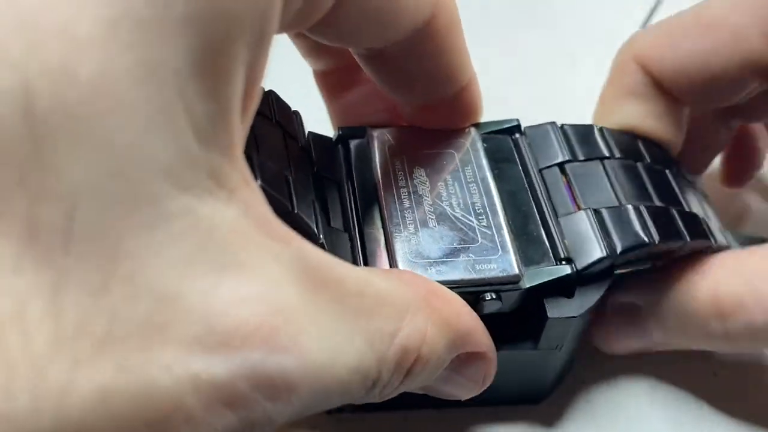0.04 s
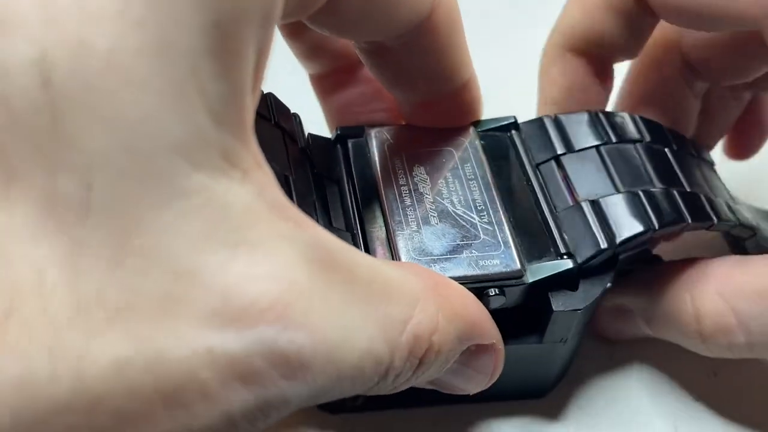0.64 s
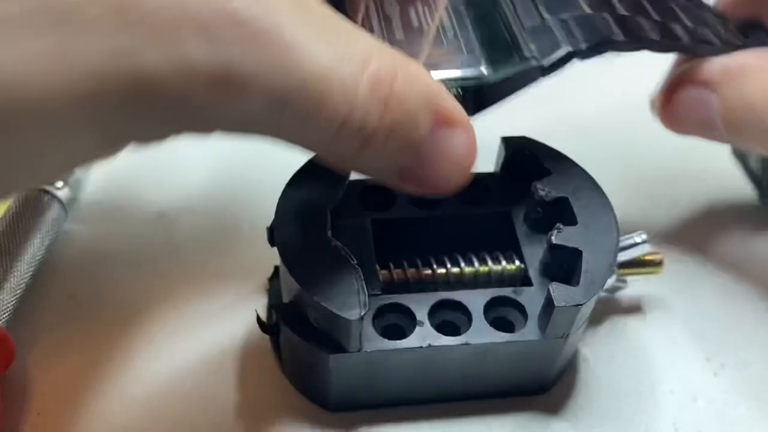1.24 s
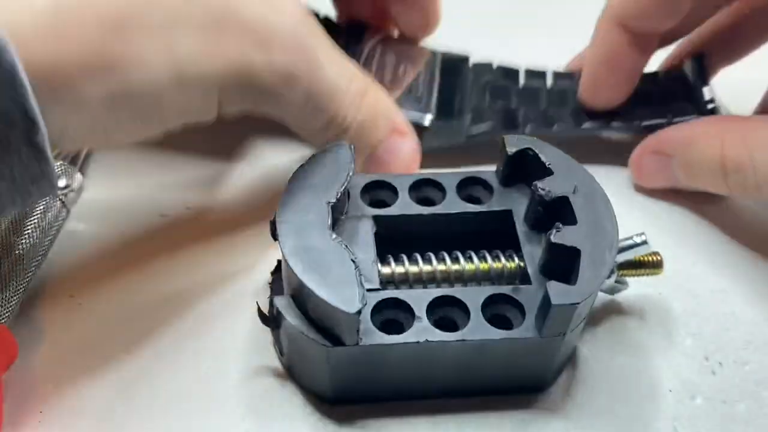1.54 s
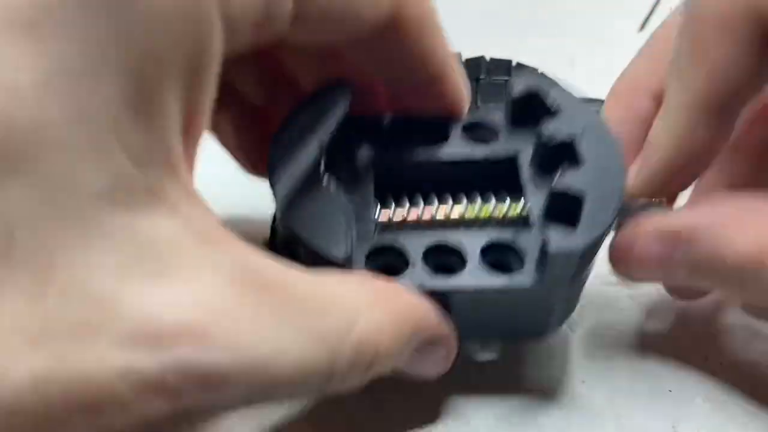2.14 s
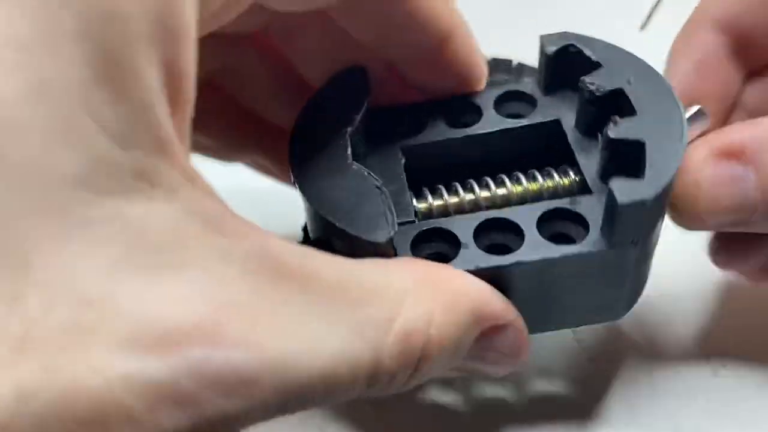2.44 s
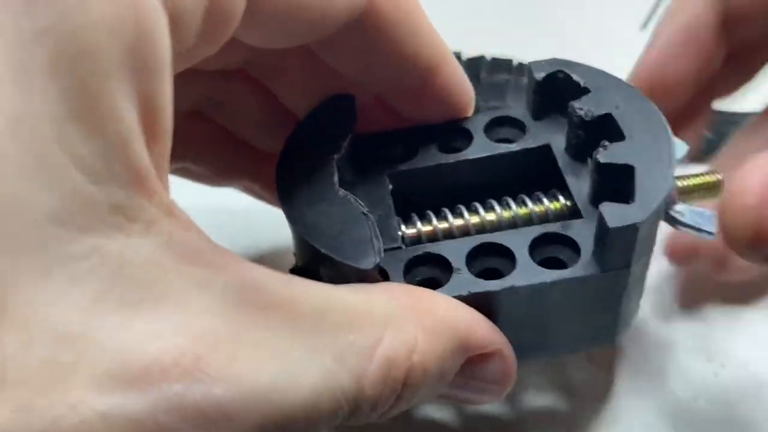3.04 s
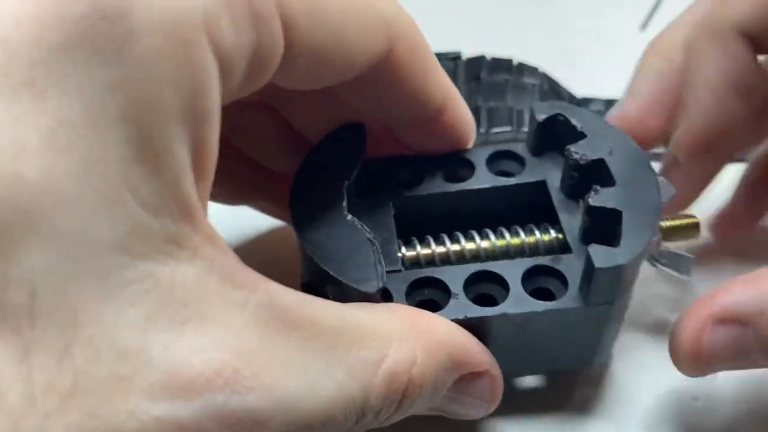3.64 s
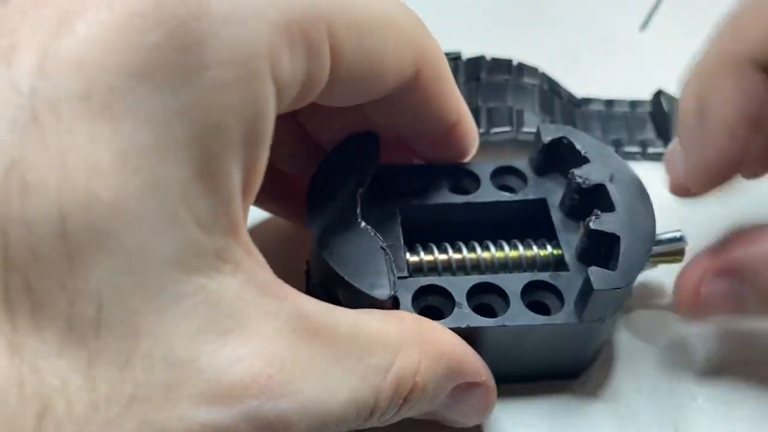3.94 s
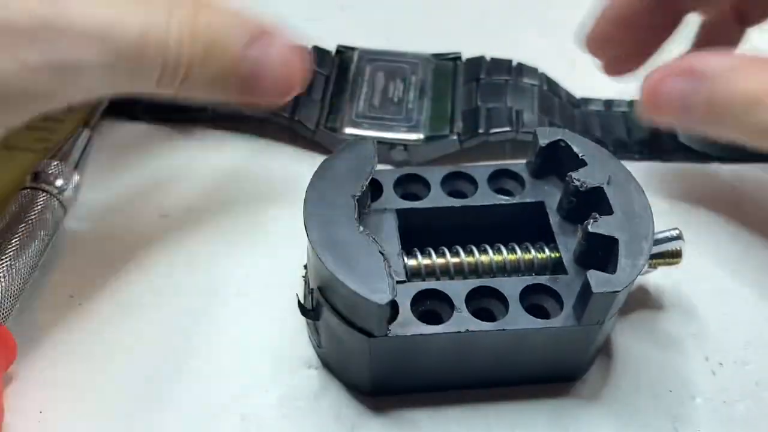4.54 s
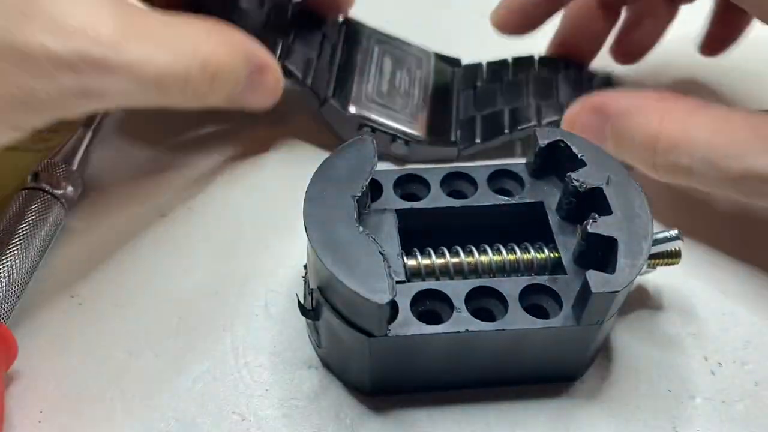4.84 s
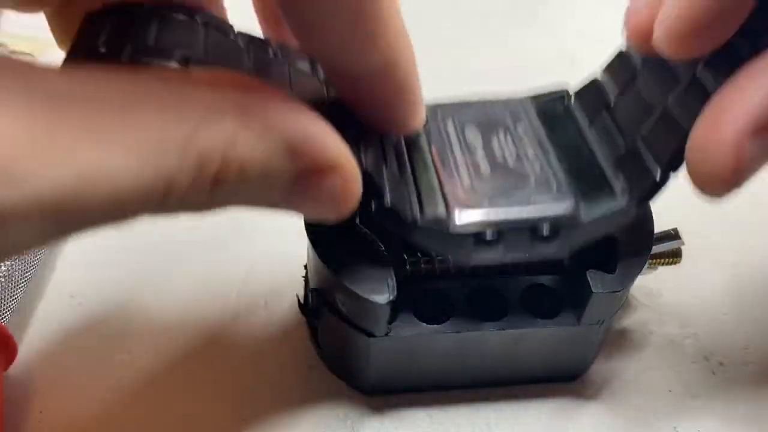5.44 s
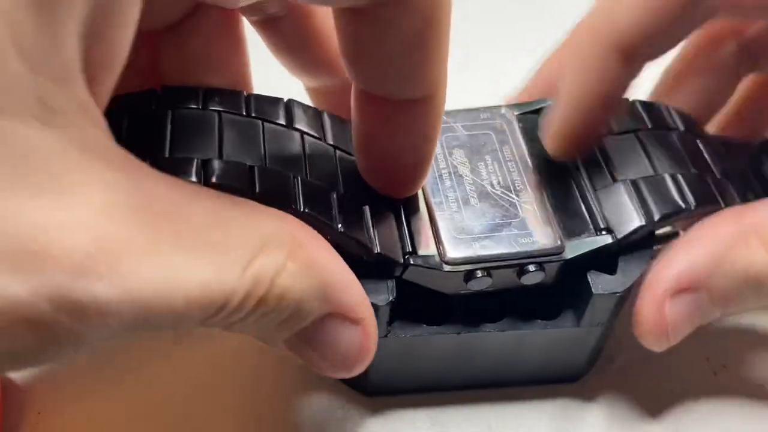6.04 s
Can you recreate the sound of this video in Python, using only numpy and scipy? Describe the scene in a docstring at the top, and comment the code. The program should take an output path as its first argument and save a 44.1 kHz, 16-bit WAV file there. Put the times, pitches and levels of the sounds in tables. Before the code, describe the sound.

For the first second or so, the steel links of a watch bracelet tick and rustle lightly as fingers lift it from a plastic holder. From about 1.3 seconds the clicks and knocks thicken, ending in a loud thud and clack at 1.7 as the watch lands on the table. Between 2 and 4.3 seconds it is quieter: the holder's wing nut turns in faint, short rasps with small metallic clicks and a slight spring ring, the sharpest near 3.5. Soft knocks and a brush of skin on the table follow. From 4.7 seconds the links tick and rattle again, growing busier around 5.4, until the watch snaps into the holder with a loud click and knock at 5.9. A few smaller clicks follow until about 6.2. Everything is close to the microphone in a small, quiet room.

```python
"""Steel links tick and rustle as fingers lift a watch out of a plastic holder; it is put down, and the
table's modes answer with a thud and a clack. The holder's wing nut is turned: stick-slip friction rasps
in the thread, and knocks of the nut ring the spring and the holder. The watch is then picked up and
snapped back between the jaws. A phone with two microphone ports is close by in a small, quiet room."""
import sys
import numpy as np
from scipy import signal
from scipy.fft import rfft, irfft, next_fast_len
from scipy.io import wavfile

SR = 44100
rng = np.random.default_rng(int(sys.argv[2]) if len(sys.argv) > 2 else 0)


def waveform_to_disk(signal):
    """Save audio, clipped to [-1, 1], as 16-bit WAV at the path in sys.argv[1]."""
    frames = np.transpose(np.atleast_2d(signal))
    scaled = np.clip(frames, -1, 1) * 32767
    samples = np.round(scaled).astype(np.int16)
    wavfile.write(sys.argv[1], SR, samples)


N = 276885
T = np.arange(N) / SR
TOP_HZ = 16200

# normal modes of the watch case and links: f/Hz, level/dB, t60/s
STEEL = [(1750, 2, .009), (2170, 1, .015), (2760, 0, .015), (3300, -2, .005), (3900, -2, .005),
         (5200, -4, .004), (6600, 2, .007), (7100, -1, .005), (7700, 1, .008), (8400, -1, .004),
         (9950, 1, .006), (10500, 0, .005), (11000, 0, .009), (12200, 1, .009), (13200, 0, .004),
         (14400, 1, .005), (15300, 2, .005)]


def undb(db):
    """Amplitude ratio of a level in decibels."""
    return 10 ** (np.asarray(db) / 20)


def unit(x, span):
    """Energy normalisation: spread over span seconds, x would have rms 1."""
    return x / np.sqrt(np.sum(x ** 2) / (span * SR) + 1e-18)


def shape(points, hz):
    """Gain of an (f/Hz, level/dB) outline, interpolated in log frequency."""
    f, db = np.transpose(points)
    return undb(np.interp(np.log(hz + 1), np.log(f), db))


def bell(hz, centre_hz, width, db):
    """Gain of a Gaussian bump in log frequency."""
    return undb(db * np.exp(-(np.log((hz + 1) / centre_hz) / width) ** 2))


def colour(x, points):
    """Spectral shaping by an outline; rms 1."""
    y = irfft(rfft(x) * shape(points, np.fft.rfftfreq(len(x), 1 / SR)), len(x))
    return y / y.std()


def band(x, lo_hz, hi_hz):
    """Causal band-pass filter."""
    sos = signal.butter(3, [lo_hz, min(hi_hz, .48 * SR)], "band", fs=SR, output="sos")
    return signal.sosfilt(sos, x)


def fade(t, t60):
    """Exponential decay, 60 dB in t60 seconds."""
    return np.exp(-np.log(1000) * t / t60)


def add(track, start, x):
    """Superposition: mix x into a track from start seconds on."""
    i = max(int(start * SR), 0)
    track[..., i:i + x.shape[-1]] += x[..., :N - i]


def strokes(rows, taper):
    """Amplitude envelope of movements; taper is the share of each spent rising and falling."""
    envelope = np.zeros(N)
    for start, length, db in rows:
        add(envelope, start, undb(db) * signal.windows.tukey(int(length * SR) + 2, taper))
    return envelope


def grains(count, per_s, spread_db):
    """Shot noise: sparse tiny impacts of unequal size."""
    size = undb(spread_db * np.minimum(rng.exponential(size=count), 4))
    return (rng.random(count) < per_s / SR) * size * rng.standard_normal(count)


def ring(modes, t, scatter_db, detune):
    """Free vibration: damped modes, one row each, with weight, pitch and phase drawn anew per blow."""
    hz, db, t60 = np.transpose(modes)[:, :, None]
    weight, pitch, phase = rng.standard_normal((3, len(modes), 1))
    cycles = hz * (1 + detune * pitch) * t + phase
    return undb(db + scatter_db * weight) * np.sin(2 * np.pi * cycles) * fade(t, t60)


def friction(spectrum, per_s, spread_db, smooth_db, catch_db, catch_hz):
    """Stick-slip friction: asperities catch and let go, giving grains over a hiss, in spurts; rms 1."""
    noise = unit(grains(N, per_s, spread_db), N / SR) + undb(smooth_db) * rng.standard_normal(N)
    spurts = np.interp(T * catch_hz, np.arange(4000), rng.standard_normal(4000))
    return colour(noise * undb(catch_db * spurts), spectrum)


def ticks(events, modes, crack_db, crack_t60, contact_s, scrape_db, body_db, variety):
    """Impact of small metal parts: a chattering contact force convolved with their impulse response."""
    out, t, lead_s = np.zeros(N), T[:8192], .004
    hz = np.fft.rfftfreq(len(t), 1 / SR)
    lowest_hz = modes[0][0]
    for start, db, bright_hz, low_db in events:
        partials = ring(modes, t, scatter_db=2 * variety, detune=.012 * variety)
        crack = unit(rng.standard_normal(len(t)) * fade(t, crack_t60), 1)
        response = unit(partials.sum(0), .92) + undb(crack_db) * crack
        chatter_s = contact_s * undb(.058 * (db + 21.5))  # harder blows chatter longer
        age = (t - lead_s) / chatter_s - .5
        contact = np.exp(-(age / .54) ** 2) + undb(scrape_db) * np.exp(-np.abs(age))
        force = contact * rng.standard_normal(len(t))
        # the struck part favours its own range of pitch
        sound = irfft(rfft(response) * rfft(force) * bell(hz, bright_hz, width=.2, db=5))
        treble = unit(band(sound, 5000, 19000), .94)
        body = undb(low_db + body_db) * unit(band(sound, .93 * lowest_hz, 3600), 1)
        add(out, start + .0006 - lead_s, undb(db) * unit(treble + body, .00082))
    return out


def hush(level_db=-69, side_db=-11):
    """Ambient noise: the room's low, steady background, largely coherent at the two ports."""
    # noise spectrum: f/Hz, level/dB
    spectrum = [(20, -10.5), (50, 1), (80, 1.5), (160, -8.5), (350, -16.5), (1000, -30), (2000, -29),
                (4000, -32.5), (8000, -38), (12000, -37), (16000, -48.5)]
    mid, side = (colour(rng.standard_normal(N), spectrum) for _ in range(2))
    return undb(level_db) * (mid + undb(side_db) * np.array([side, -side]))


def grip_rumble():
    """Structure-borne sound: friction of a hand changing its grip makes the holder rumble."""
    # grips: t/s, duration/s, level/dB
    grips = [(0, 0.43, -62), (.36, 0.31, -58), (.72, 0.91, -60), (.89, 0.18, -56.5), (1.31, .13, -45),
             (1.43, 0.35, -56.5), (1.8, 0.24, -65.5), (4.09, 0.267, -71), (4.7, 0.38, -61),
             (5.42, 0.35, -54.5), (5.85, 0.44, -50)]
    # rumble spectrum: f/Hz, level/dB
    spectrum = [(40, -14.5), (80, 6.5), (140, -4.5), (230, 2), (340, -5.5), (500, -29), (1200, -33)]
    rumble = friction(spectrum, per_s=120, spread_db=-1.5, smooth_db=2.5, catch_db=6.5, catch_hz=23.96)
    return strokes(grips, taper=.25) * rumble


def loose_links(per_s=45, spread_db=4, chatter_t60=.005):
    """A random impact train: links drop into their play and ring briefly; rms 1."""
    out, t = np.zeros(N), T[:SR // 50]
    starts = np.cumsum(rng.gamma(2, .5 / per_s, int(2 * per_s * N / SR)))
    for start in starts[starts < T[-1]]:
        chatter = rng.standard_normal(len(t)) * fade(t, chatter_t60)
        tick = signal.fftconvolve(chatter, ring(STEEL, t, scatter_db=3, detune=.03).sum(0))
        add(out, start, undb(spread_db * rng.standard_normal()) * unit(tick, 1))
    return unit(band(out, 3200, TOP_HZ), N / SR)


def bracelet_rustle():
    """Sliding friction of link on link and skin on steel, with loose ticks; movements add in power."""
    # the bracelet bends or slides in the fingers: t/s, duration/s, level/dB
    flexes = [(.035, 0.07, -56.5), (.275, 0.17, -71.5), (.37, 0.12, -49.5), (.54, 0.062, -59.5),
              (.73, 0.065, -55.5), (.91, 0.16, -63.5), (1.17, 0.065, -67), (1.32, 0.094, -56),
              (1.53, .19, -44), (4.58, 0.21, -69), (4.75, 0.07, -51), (5.03, 0.14, -58),
              (5.425, 0.064, -54.5), (5.6, 0.13, -64), (5.81, 0.025, -52.5), (5.885, 0.072, -47),
              (6.055, 0.11, -52), (6.135, .11, -44.5)]
    # the held watch shifts slightly: t/s, duration/s, level/dB
    holds = [(0, 0.13, -67.5), (.35, 0.42, -78), (.7, 0.28, -66.5), (.98, 0.43, -67), (4.66, 0.26, -69.5),
             (4.9, 0.23, -63), (5.4, 0.338, -72.5), (5.8, 0.45, -61)]
    # spectrum of links sliding over each other: f/Hz, level/dB
    slide = [(900, -14), (2200, -2), (3200, 0), (5000, -0.5), (7300, 4), (9000, -1.5), (12000, 1.5),
             (15500, -1), (17000, -27)]
    # spectrum of skin dragging on links: f/Hz, level/dB
    skin = [(250, -9), (450, -1), (800, 2), (1300, -5), (2200, -14), (5000, -26)]
    flex, held = strokes(flexes, taper=.43), strokes(holds, taper=.3)
    crackle = friction(slide, per_s=450, spread_db=3.7, smooth_db=-8, catch_db=4.5, catch_hz=90)
    drag = friction(skin, per_s=500, spread_db=3.5, smooth_db=-2, catch_db=2.5, catch_hz=60)
    links = undb(-2) * crackle + undb(-1) * loose_links()
    return np.hypot(flex, held) * links + np.hypot(undb(-8) * flex, held) * drag


def table_knocks(split_hz=480, rise_s=.008):
    """Impact excitation: low table modes thud, high ones clack, links rattle; returns wood and steel."""
    # blows through holder, watch or hand: t/s, thud level/dB, thud f/Hz, clack level/dB, rattle level/dB
    blows = [(.002, -52, 140, -67, -63), (0.189, -50, 146, -67, -69.5), (.441, -50, 237, -48, -38.5),
             (.776, -48.5, 352, -46.5, -65), (1.003, -37, 139, -73, -57), (1.32, -33.5, 345, -39, -48.5),
             (1.359, -31.5, 242.5, -57, -59), (1.521, -29, 352.2, -57, -43), (1.542, -50, 223, -48, -37),
             (1.571, -32.5, 190, -28.5, -27.5), (1.626, -37.5, 201.6, -37, -38.5),
             (1.7023, -16, 328, -15.5, -34.5), (3.873, -49, 229.4, -70.5, -66),
             (4.355, -43.5, 232, -68.5, -61), (4.365, -49, 114, -85, -73), (4.579, -59.5, 113.5, -82, -74),
             (5.072, -52.5, 371, -46, -48), (5.414, -37.5, 296, -54, -45.5),
             (5.463, -42, 112.5, -57.5, -45), (5.64, -44, 290, -43, -49.5), (5.824, -44.5, 208, -67, -59),
             (5.935, -26, 258, -18.5, -24.5), (6.159, -56, 215, -59, -58), (6.191, -43, 187, -40, -36.5)]
    # normal modes of table and holder: f/Hz, level/dB, t60/s
    modes = [(75.6, -22.5, 0.087), (121, -12.5, 0.19), (145.7, -13, .2), (215, -9.5, .15),
             (303.7, -6, 0.06), (344, 2.5, 0.045), (371.4, -6.5, 0.02), (527, -4, 0.15), (695.6, -2, 0.07),
             (847, -1, 0.069), (957, -7.5, 0.071), (993.6, 0.5, 0.063), (1142, -2.5, 0.051),
             (1350, -5.5, 0.04), (1467, -8, 0.053), (1740, -18, .05), (2179, -13, 0.02),
             (3000, -12.5, 0.018)]
    wood, steel, t = np.zeros(N), np.zeros(N), T[:SR // 3]
    hz = np.transpose(modes)[0]
    low = hz < split_hz
    rise = 1 - np.exp(-t / rise_s)  # the heavy top takes a moment to get moving
    for start, thud_db, thud_hz, clack_db, rattle_db in blows:
        partials = ring(modes, t, scatter_db=1, detune=.003)
        noise = rng.standard_normal(len(t))
        # a softer, longer push favours lower modes
        thud = unit(bell(hz[low], thud_hz, width=.25, db=8) @ partials[low], 1)
        thud += undb(-9.5) * unit(band(noise, 140, split_hz) * fade(t, t60=.073), 1)
        add(wood, start, undb(thud_db) * unit(thud * rise, .012))
        clack = unit(partials[~low].sum(0), 1)
        clack += undb(-4) * unit(band(noise, 450, 1450) * fade(t, t60=.072), .89)
        add(wood, start, undb(clack_db) * unit(band(clack, 600, 3500), .009))
        shake = grains(len(t), per_s=5000, spread_db=6.8) * fade(t, t60=.13)
        link_response = ring(STEEL, T[:SR // 30], scatter_db=5, detune=.022).sum(0)
        ringing = signal.fftconvolve(shake, link_response)[:len(t)]
        rattle = unit(ringing, .93) + undb(1.5) * unit(band(shake, 1200, 8300), 1)
        add(steel, start, undb(rattle_db) * unit(rattle, .0082))
    return wood, steel


def link_strikes():
    """Hard, brief contact of link on link excites the high modes of the steel."""
    # strikes: t/s, level/dB, brightest ring f/Hz, relative body level/dB
    strikes = [(.0576, -37.5, 12100, -7.5), (.3789, -33, 6400, -13), (.4387, -22, 6530, -15.5),
               (.5708, -42, 11500, -11), (.7736, -35, 6720, -13), (.8954, -46, 12100, -14),
               (.9074, -40.5, 4040, -7.5), (.9853, -44.5, 6270, -6), (1.0105, -38, 7400, -14),
               (1.2488, -44, 12500, -6), (1.3194, -27, 11400, -35), (1.348, -37.5, 6400, -11),
               (1.3784, -38.5, 6880, -29), (1.4082, -30, 10800, -15), (1.5259, -23, 10600, -35),
               (1.5404, -23.5, 12200, -14), (1.5715, -13.5, 7050, -3.5), (1.6251, -22.5, 5370, -4.5),
               (1.7017, -10, 7054, -9), (4.6667, -38.5, 7760, -15.5), (4.707, -31.5, 7520, -28),
               (4.7334, -29.5, 10000, -14), (4.7669, -19.5, 10400, -33), (4.793, -34.5, 3900, -20),
               (4.8123, -35.5, 10700, -30), (4.8254, -35, 9650, -35.5), (4.849, -36.5, 10500, -9.5),
               (4.9358, -34, 10900, -11), (4.9428, -34.5, 10500, -20), (5.036, -35, 12200, -23),
               (5.0694, -37.5, 10900, -0.5), (5.0873, -25.5, 11100, -24), (5.1367, -46.5, 6310, -8),
               (5.1707, -36, 7080, -28), (5.179, -38.5, 12250, -13.5), (5.2171, -39, 15100, -15),
               (5.4012, -34.5, 6400, -14), (5.4364, -21.5, 8100, -18), (5.4424, -24, 7740, -7.5),
               (5.4604, -30, 11400, -7.5), (5.469, -25.5, 7860, -35), (5.5351, -32.5, 7600, -11),
               (5.5472, -31.5, 7300, -16), (5.5892, -17, 7100, -8.5), (5.6361, -17, 12000, -16),
               (5.6508, -28, 14650, -11.5), (5.8021, -41.5, 9970, -9.5), (5.8326, -28.5, 11060, -16.5),
               (5.878, -14, 7240, -5.5), (5.8956, -28, 7710, 5), (5.9357, -5.5, 10900, -4),
               (5.9421, -15, 10200, -26), (6.0075, -35, 10500, -7), (6.0686, -41, 12500, -5),
               (6.137, -20, 13200, -9.5), (6.1906, -21, 7700, -36), (6.2148, -31, 5100, -24)]
    return ticks(strikes, STEEL, crack_db=-5, crack_t60=.00081, contact_s=.0028,
                 scrape_db=-18.5, body_db=-.5, variety=3.2)


def finger_scuffs():
    """Friction coloured by resonance: fingertips scuff the hollow holder and the watch."""
    # scuffs: t/s, duration/s, level/dB
    scuffs = [(.18, 0.077, -60), (.772, 0.041, -46), (.99, .043, -75), (1.185, 0.054, -50.5),
              (4.74, 0.16, -58), (4.93, 0.11, -60.5), (5.065, 0.062, -54)]
    # scuff spectrum: f/Hz, level/dB
    spectrum = [(150, -16), (350, -0.5), (600, -3), (850, 1), (1150, -3), (1600, -20), (4000, -31)]
    rub = friction(spectrum, per_s=530, spread_db=5.5, smooth_db=8, catch_db=5.5, catch_hz=87.56)
    return strokes(scuffs, taper=.79) * rub


def skin_sweeps():
    """Broadband friction noise: skin sweeps lightly over the table."""
    # sweeps: t/s, duration/s, level/dB
    sweeps = [(.72, 0.086, -60), (1.17, 0.15, -64.5), (1.92, 0.68, -78.5), (4.29, 0.45, -70),
              (4.55, 0.2, -67.5), (4.93, 0.1, -62.5)]
    # hiss spectrum: f/Hz, level/dB
    spectrum = [(600, -18.5), (2000, -7), (4000, 0), (7000, 2), (11000, -0.5), (15500, -4.5), (17000, -22)]
    return strokes(sweeps, taper=.26) * colour(rng.standard_normal(N), spectrum)


def thread_rasp():
    """Stick-slip friction: the wing nut rasps along its thread in short strokes."""
    # turns of the nut: t/s, duration/s, level/dB
    turns = [(1.94, 0.096, -72.5), (2.119, .031, -67), (2.204, 0.033, -65.5), (2.298, 0.058, -54),
             (2.39, .13, -61.5), (2.53, 0.084, -77), (2.702, 0.055, -58), (2.74, 0.135, -62.5),
             (3.04, 0.075, -58.5), (3.11, .15, -64), (3.365, 0.17, -61.5), (3.702, 0.061, -60),
             (3.755, 0.067, -56.5), (4, 0.12, -68.5), (4.135, 0.043, -74)]
    # rasp spectrum: f/Hz, level/dB
    spectrum = [(400, -6.5), (1100, 1.5), (2000, 4), (2700, -1), (4000, -1), (5200, -10), (7200, 0),
                (10000, -6), (13000, -7), (16000, -17)]
    rasp = friction(spectrum, per_s=1500, spread_db=3.3, smooth_db=-2, catch_db=2.5, catch_hz=150)
    return undb(-3) * strokes(turns, taper=.6) * rasp


def nut_knocks(spring_db=-27, holder_db=-15):
    """Backlash: the nut knocks in its play and sets the spring and the holder in free vibration."""
    # knocks: t/s, level/dB, brightest ring f/Hz, relative body level/dB
    knocks = [(2.3092, -49.5, 6150, -9), (2.3347, -44, 10300, -2), (2.827, -27, 6200, -9),
              (3.062, -46, 4100, -2), (3.137, -45.5, 6950, -3.5), (3.1956, -26.5, 7660, -18),
              (3.3666, -40, 7700, -15), (3.4354, -30.5, 6950, -21), (3.469, -15, 6890, -21),
              (3.5377, -35.5, 6970, -9.5), (3.706, -45, 3990, -6), (3.7773, -40.5, 6940, -9),
              (3.7879, -35, 6930, -13.5), (3.813, -43, 7250, -8), (3.8596, -36.5, 6850, -13.5),
              (4.34, -48.5, 4000, -9)]
    # quickly damped modes of screw, spring and nut: f/Hz, level/dB, t60/s
    screw_modes = [(950, -5, .008), (1350, -4, .008), (1800, 0, .011), (2740, 2, .008), (3700, -2, .004),
                   (4500, -6, .004), (5200, -6, .004), (6880, 2, .005), (7570, 1, .005), (8600, 0, .005),
                   (10200, 1, .004), (11700, -11, .004), (13000, -12, .004), (15400, -17, .004)]
    # modes in which the spring sings on: f/Hz, level/dB, t60/s
    spring_modes = [(1705, -7, .2), (1800, -4, .2), (1885, -2, .26), (1908, 1, .33), (2030, -5, .22),
                    (2270, -9, .2), (2670, -7, .22), (2870, -6, .22), (3060, -9, .2), (3890, -12, .2)]
    # modes of the plastic holder: f/Hz, level/dB, t60/s
    holder_modes = [(218, -2.5, 0.042), (360, -2, 0.039), (528, -8.5, 0.047), (705, 3.5, 0.014)]
    rings, t = np.zeros(N), T[:SR // 2]
    for start, db, _, low_db in knocks:
        spring = unit(ring(spring_modes, t, scatter_db=2, detune=.002).sum(0), .1)
        holder = unit(ring(holder_modes, t, scatter_db=2, detune=.05).sum(0), .002)
        drive_db = db + low_db
        shaken_db = spring_db + .25 * (drive_db + 35.5)  # hard knocks shake the spring more
        add(rings, start, undb(drive_db) * (undb(shaken_db) * spring + undb(holder_db) * holder))
    return rings + ticks(knocks, screw_modes, crack_db=-10.5, crack_t60=.0037, contact_s=.0025,
                         scrape_db=-11, body_db=6.5, variety=.36)


def room(x, wet_db, t60_low, t60_high, early_db, early_t60):
    """Reverberation: early lateral reflections, then a short tail whose bass both ports share."""
    # the surfaces absorb the highest treble: f/Hz, level/dB
    reflectance = [(200, -1), (6500, 1.5), (10000, -4.5), (16000, -7)]
    t, antiphase = T[:SR // 2], np.array([[1], [-1]])
    edges_hz, t60s = np.geomspace(60, 17000, 8), np.geomspace(t60_low, t60_high, 7)
    mid, side = rng.standard_normal((2, len(t)))
    noise = mid + antiphase * band(side, 180, 14000)
    tail = sum(band(noise, lo, hi) * fade(t, t60) for lo, hi, t60 in zip(edges_hz, edges_hz[1:], t60s))
    early = antiphase * band(rng.standard_normal(len(t)), 600, 16000) * fade(t, early_t60)
    response = undb(wet_db) * unit(tail * (t > .008), 2 / SR)
    response += undb(early_db) * unit(early * (t > .002), 2 / SR)
    response = irfft(rfft(response) * shape(reflectance, np.fft.rfftfreq(len(t), 1 / SR)), len(t))
    return signal.fftconvolve(x[None], response, axes=1)[:, :N]


def ports(x, shade):
    """Acoustic shadow: the phone's body shades the right port and shifts the treble's phase."""
    # left minus right at shade = 1: f/Hz, level/dB
    balance = [(100, -0.5), (400, 5.5), (900, 5), (2300, 6), (4400, 3.5), (8000, 0.5), (15000, 0)]
    # lead of the left port: f/Hz, phase/rad
    phase_lead = [(0, 0), (1000, 0), (2000, .6), (4000, 0), (7100, .1), (9000, -3.1), (11300, -6.3),
                  (13500, -9.4), (15500, -12.5), (17000, -13)]
    size = next_fast_len(N + 4096)
    hz = np.fft.rfftfreq(size, 1 / SR)
    phase = np.interp(hz, *np.transpose(phase_lead))
    left = shape(balance, hz) ** (shade / 2) * np.exp(.5j * phase)
    return irfft(rfft(x, size) * np.array([left, 1 / left]), size)[:, :N]


def scene():
    """Direct plus reverberant sound: small parts lean left; the broad table top feeds the room more."""
    wood, rattle = table_knocks()
    small = rattle + link_strikes() + thread_rasp() + nut_knocks()
    small += grip_rumble() + bracelet_rustle() + finger_scuffs() + skin_sweeps()
    near = small + room(small, wet_db=-19, t60_low=.42, t60_high=.15, early_db=-12, early_t60=.035)
    table = wood + room(wood, wet_db=-14, t60_low=.32, t60_high=.16, early_db=-2.5, early_t60=.045)
    return ports(near, shade=.99) + ports(table, shade=.33) + hush()


def record(dry):
    """Soft limiting and low-pass: the loudest peaks are rounded and the top treble is cut."""
    ceiling = 1.3
    rounded = ceiling * np.tanh(dry / ceiling)
    return signal.sosfilt(signal.ellip(8, .2, 80, TOP_HZ, fs=SR, output="sos"), rounded)


dry = scene()
out = record(dry)
waveform_to_disk(out)
```